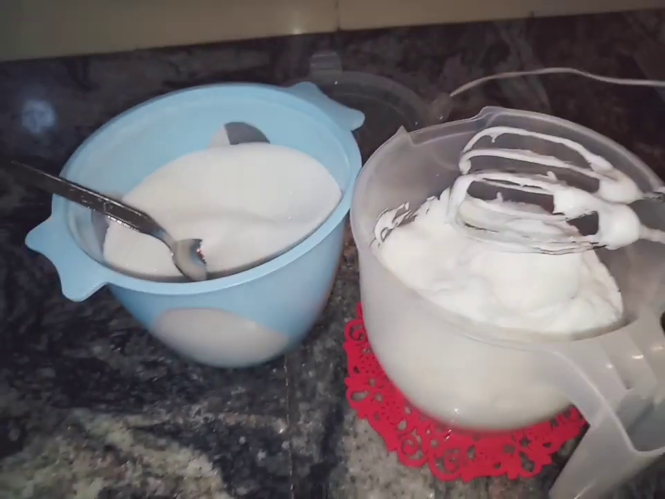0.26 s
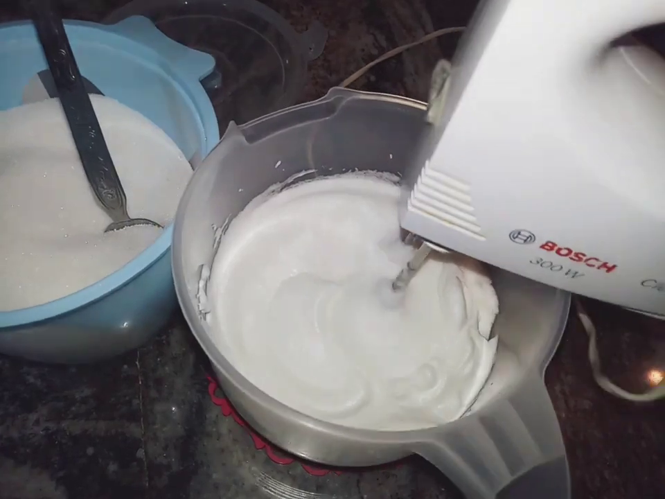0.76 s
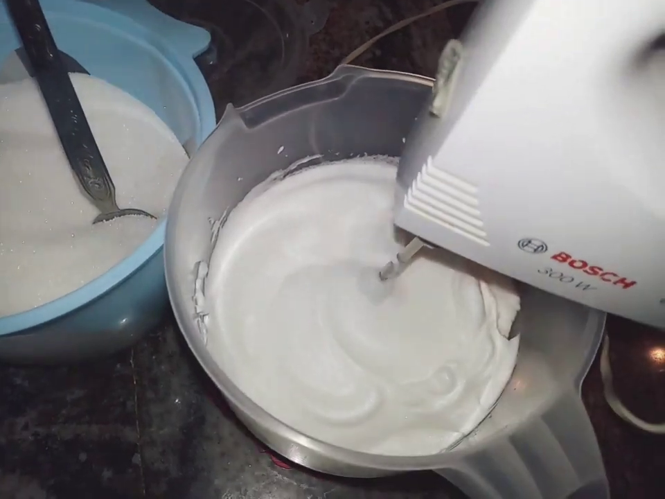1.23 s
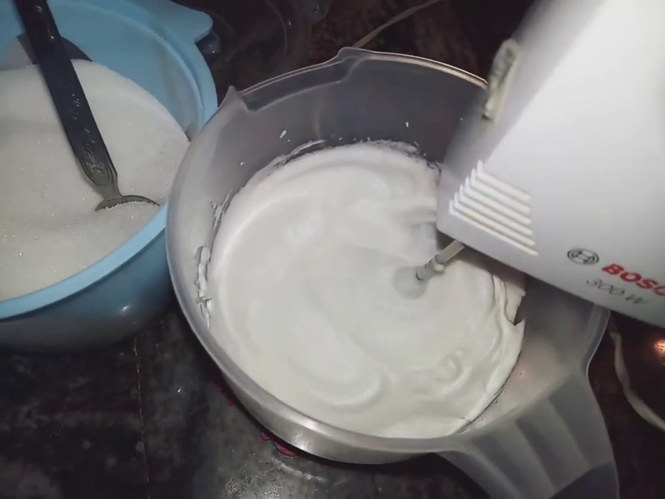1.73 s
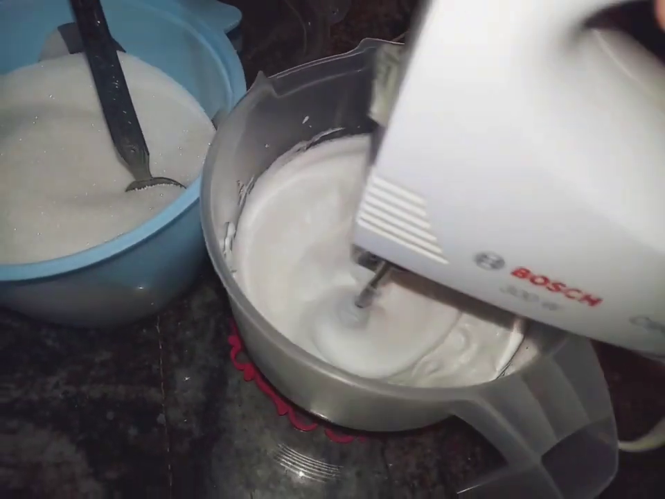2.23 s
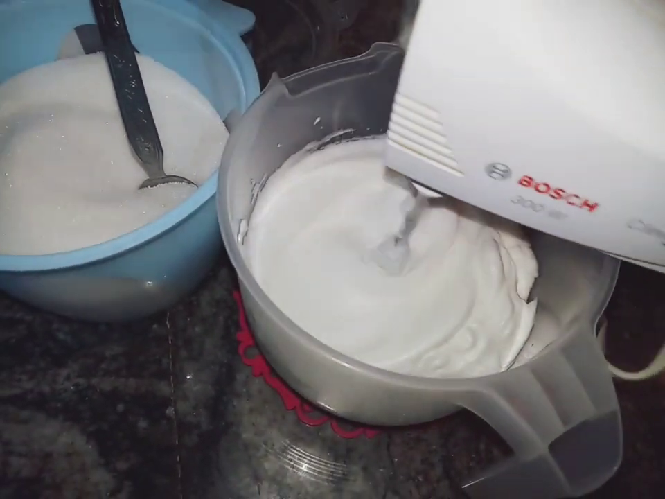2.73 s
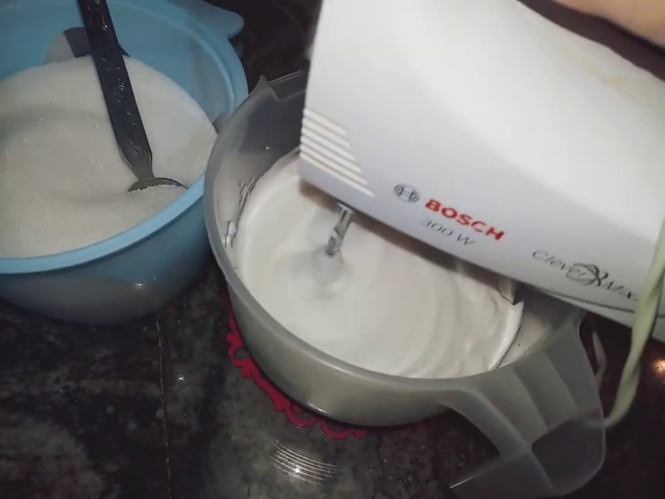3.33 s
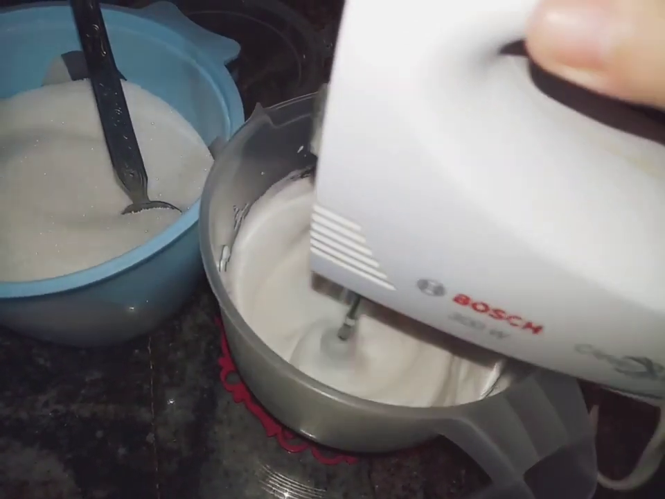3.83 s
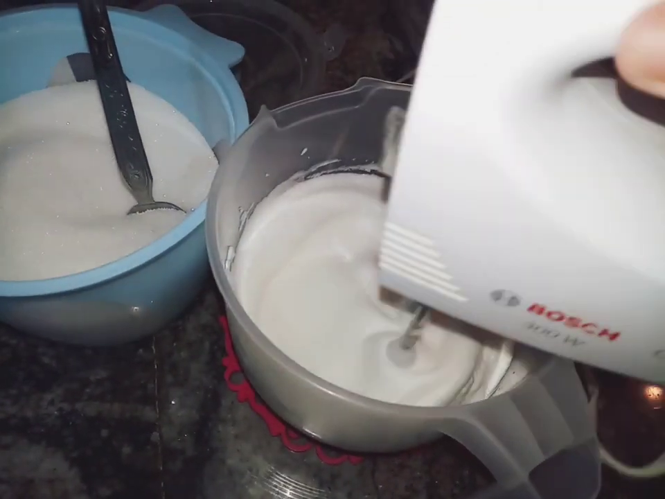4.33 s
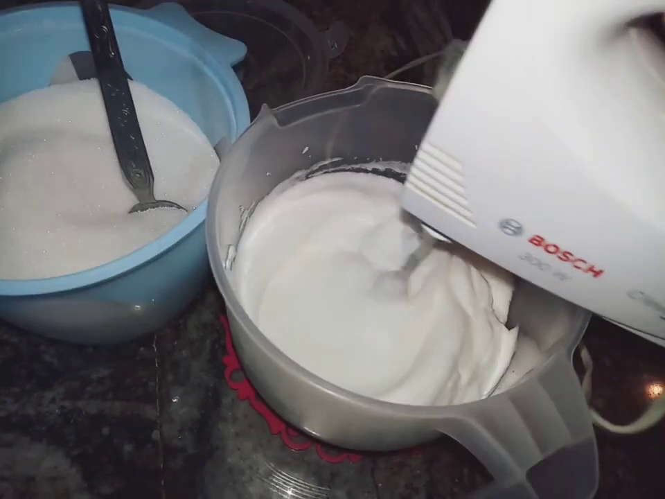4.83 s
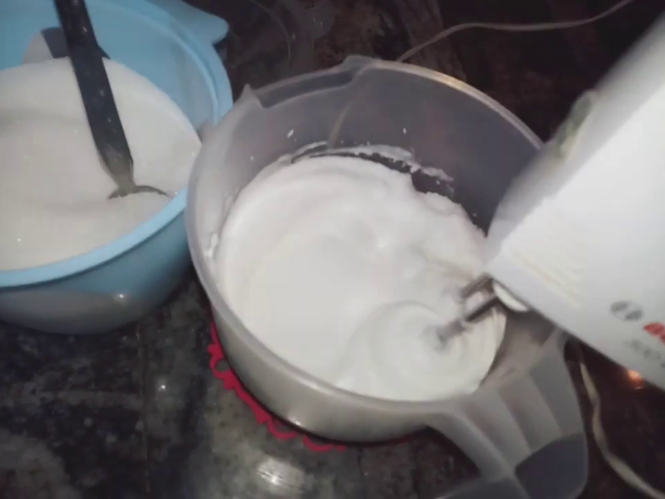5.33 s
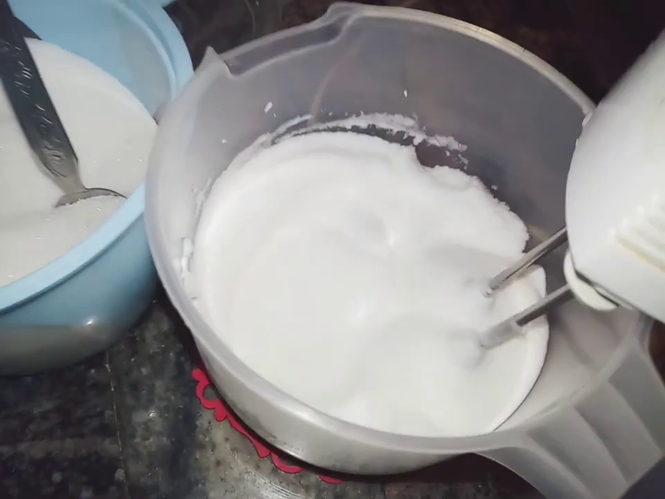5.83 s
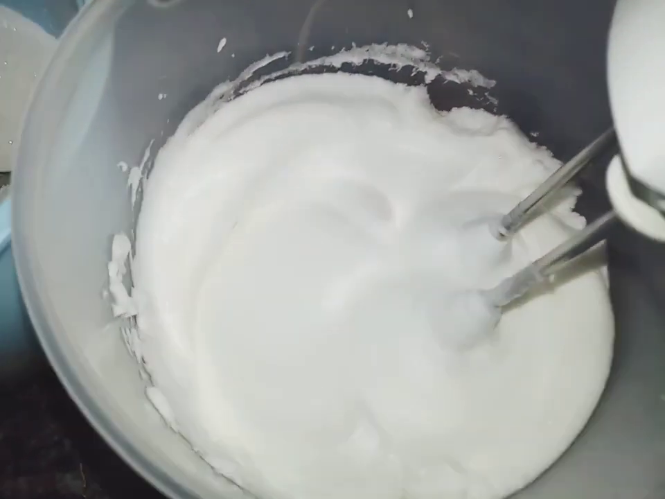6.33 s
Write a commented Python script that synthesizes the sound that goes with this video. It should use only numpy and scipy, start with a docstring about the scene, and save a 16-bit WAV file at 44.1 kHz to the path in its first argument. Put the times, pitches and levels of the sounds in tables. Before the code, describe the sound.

After a moment of faint hum and a brief silence, an electric hand mixer comes in with a soft bump, already at full speed. Its motor whines and throbs, the gears rasp, and cream churns in a plastic jug. The wire beaters rattle and knock against the jug wall in irregular bursts. Toward the end, a rush of air from the vents grows. It is heard close up on a kitchen counter.

```python
"""An electric hand mixer whips cream in a plastic jug on a kitchen counter, heard close up.
A faint low hum and thin whistles over dull hiss last 0.3 s, then silence. At 0.45 s the mixer comes in
with a soft bump, already at speed: the motor whines and throbs with the mains, gears rasp, cream churns,
the jug drones. The wire beaters rattle in bursts whenever they are steered against the jug wall.
Toward the end the vents turn to face the listener and their rush of air grows."""
import sys
import numpy as np
from scipy import signal
from scipy.fft import irfft, next_fast_len
from scipy.io import wavfile
from scipy.ndimage import uniform_filter1d, minimum_filter1d

SR = 44100
rng = np.random.default_rng(int(sys.argv[2]) if len(sys.argv) > 2 else 0)


def dump(signal):
    """Clip the signal to [-1, 1] and save it as 16-bit WAV at the path in sys.argv[1]."""
    limited = np.clip(np.atleast_2d(signal).T, -1, 1)
    pcm = np.round(limited * 32767).astype(np.int16)
    wavfile.write(sys.argv[1], SR, pcm)


N = 290178
T = np.arange(N) / SR
QUIET_END_S, MIXER_START_S = .301, .449
MAINS_HZ, ROTOR_SLOTS, GEAR_RATIO, WIRES = 50, 8, 21, 4


def amp(db):
    """Decibels to gain."""
    return 10 ** (np.asarray(db) / 20)


def unit(x):
    """Scales to an rms of 1."""
    return x / np.sqrt(np.mean(x ** 2) + 1e-20)


def curves(rows):
    """One automation curve for each table column after the time."""
    times, *columns = np.transpose(rows)
    return [np.interp(T, times, column) for column in columns]


def value_at(points, hz):
    """Reads a table along a log frequency axis."""
    freqs, values = np.transpose(points)
    return np.interp(np.log(hz + 1), np.log(freqs), values)


def colour(x, eq, size=2048):
    """Minimum-phase filter that follows an EQ curve."""
    log_gain = np.log(amp(value_at(eq, abs(np.fft.fftfreq(size, 1 / SR)))))
    taps = np.fft.ifft(np.exp(np.conj(signal.hilbert(log_gain)))).real
    return signal.oaconvolve(x, taps.reshape((1,) * (x.ndim - 1) + (-1,)), axes=-1)[..., :x.shape[-1]]


def band(x, low_hz, high_hz):
    """Steep band-pass."""
    return signal.sosfilt(signal.butter(3, [low_hz, high_hz], "band", fs=SR, output="sos"), x)


def ring(x, modes):
    """Sum of damped resonances; the dB of each sets its energy."""
    out = 0
    for hz, width, db in modes:
        radius = np.exp(-np.pi * abs(width) / SR)
        feedback = [1, -2 * radius * np.cos(2 * np.pi * hz / SR), radius ** 2]
        out = out + amp(db) * np.sqrt(1 - radius) * signal.lfilter([1, 0, -1], feedback, x)
    return out


def wander(hz, size=32768):
    """Smooth random modulation of rms 1, rolling off around hz."""
    length = next_fast_len(N, True)
    rolloff = np.exp(-.5 * (np.arange(size) * SR / length / hz) ** 2)
    real, imag = rng.standard_normal((2, size)) * rolloff
    return unit(irfft(real + 1j * imag, length)[:N])


# EQ of the dull opening hiss: (frequency [Hz], gain [dB])
OPENING_HISS_EQ = [(25, -14), (70, -16), (102, 6.5), (140, -15), (250, -11), (580, -15.5), (800, -31),
                   (1900, -33), (3000, -19), (5500, -19), (7800, -29), (9000, -59)]
# Thin whistles over that hiss: (frequency [Hz], width [Hz], relative level [dB])
WHISTLE_MODES = [(106, 13, -3.5), (1500, 78, -18), (2550, 5.4, -15), (3180, 49, -10), (4670, 55, -7),
                 (5350, 42, -11)]
# Steady tones of the opening: (frequency [Hz], relative level [dB])
HUM_TONES = [(247.6, -67.5), (592.2, -71.5), (1529, -83), (2369, -72), (2466, -75)]
def faint_opening_hum(floor_db=-57, whistle_db=-58, hum_db=-1):
    """A faint low hum and thin whistles over dull hiss, before the mixer comes in."""
    hiss, drive = rng.standard_normal((2, N))
    floor = amp(floor_db) * unit(colour(hiss, OPENING_HISS_EQ))
    whistles = amp(whistle_db) * unit(ring(drive, WHISTLE_MODES))
    hum = sum(amp(db) * np.sqrt(2) * np.cos(2 * np.pi * (hz * T + rng.random())) for hz, db in HUM_TONES)
    return floor + whistles + amp(hum_db) * hum


# Reverb time around the mixer: (frequency [Hz], time to fall 60 dB [s])
REVERB_TIMES = [(150, 0.12), (1000, 0.37), (4000, 0.11), (12000, 0.017)]
def reverb(x, predelay_s=.005):
    """A short diffuse room tail, the treble dying first."""
    hz, t, spectrum = signal.stft(rng.standard_normal(16384), SR, nperseg=256)
    decay = amp(-60 * t / value_at(REVERB_TIMES, hz)[:, None])
    tail = signal.istft(spectrum * decay, SR)[1]
    tail *= np.arange(len(tail)) > predelay_s * SR
    return signal.fftconvolve(x, tail / np.linalg.norm(tail))[:N]


def bump(hz=36, peak_db=-29, decay_s=.014):
    """A soft low bump as the mixer sound sets in."""
    t = np.maximum(T - MIXER_START_S, 0)
    return -amp(peak_db) * np.cos(2 * np.pi * hz * t) * np.exp(-t / decay_s) * (T > MIXER_START_S)


# Motor speed, sagging under load: (time [s], shaft rate [Hz])
MOTOR_SPEED = [(0.45, 279.5), (1.2, 281.7), (1.5, 281.2), (1.95, 285.4), (2.3, 289), (2.48, 289),
               (2.7, 284.7), (3.15, 286.4), (3.35, 289), (3.8, 285.6), (4, 289), (4.4, 282.6),
               (4.75, 290.9), (5.1, 289.5), (5.35, 284.6), (5.6, 283.9), (6.1, 286.9), (6.58, 285.3)]
def shaft_angle(ripple_rad=.06, jitter_hz=.15):
    """The motor shaft turns: each mains pulse nudges it ahead, and the cream drags unevenly."""
    hz = curves(MOTOR_SPEED)[0] + jitter_hz * wander(12.15)
    return 2 * np.pi * np.cumsum(hz) / SR + ripple_rad * np.sin(2 * np.pi * MAINS_HZ * T)


# Drag on the beaters: (time [s], load relative to light work [dB])
CREAM_DRAG = [(0.5, 2.5), (0.8, 4), (1.55, 5.5), (1.9, -1.5), (2.45, 1.5), (3.5, 0.5), (4.4, 2), (4.75, 1),
              (5.3, 4), (5.75, -1), (6.3, -2), (6.58, 4.5)]
def drag_gain(db_per_db):
    """Gain that rides the drag of the cream: heavier work is louder."""
    return amp(db_per_db * curves(CREAM_DRAG)[0])


def strokes(angle, depth=.06):
    """A light tremolo, one pulse for each passing wire."""
    return 1 + depth * np.cos(WIRES * angle / GEAR_RATIO)


# Swells of low boom: (time [s], relative level [dB])
BOOM_LEVEL = [(0.52, -42.5), (0.82, -44), (2.29, -52), (2.43, -37), (2.85, -59), (2.88, -45), (3.14, -63),
              (3.2, -39), (3.29, -68), (3.34, -52), (3.66, -59), (3.71, -44.5), (4.18, -60), (4.42, -45.5),
              (5.06, -56), (5.09, -44), (5.31, -60), (5.63, -43), (5.97, -50), (6.58, -44.5)]
def jug_boom(angle, boom_db=-3, hum_db=-7):
    """The jug booms as it is pressed on the counter; the two beaters' wires hum, passing in turn."""
    boom = unit(band(ring(rng.standard_normal(N), [(102, 14, 0)]), 84, 125))
    hum = unit(np.cos(2 * WIRES * angle / GEAR_RATIO + .38 * wander(4.5)))
    return amp(curves(BOOM_LEVEL)[0]) * (amp(boom_db) * boom + amp(hum_db) * hum)


# Slow shaking of the jug: (time [s], level [dB])
SHAKE_LEVEL = [(0.52, -50), (1.36, -61), (1.75, -53), (2.31, -75), (2.38, -57), (2.53, -67), (4.99, -66),
               (5.36, -49.5), (6.06, -72), (6.58, -59)]
# Partials of the shake and of the growl above it: (multiple of the beater rate, relative level [dB])
SHAKE_PARTIALS = [(4, -10), (5, 13), (6, -7)]
GROWL_PARTIALS = [(10, -4), (12, -21.5), (14, 2), (22, 5), (24, -13), (34, -6)]
def jug_drone(angle, waver=.38, growl_db=-52):
    """The beaters shake the jug at multiples of their own slow rate, growling under load."""
    def tones(partials):
        out = 0
        for multiple, db in partials:
            level = amp(db) * (1 + waver * wander(7.3))
            out += level * np.cos(multiple * angle / GEAR_RATIO + waver * wander(5))
        return unit(out)

    shake = amp(curves(SHAKE_LEVEL)[0]) * tones(SHAKE_PARTIALS)
    growl = amp(growl_db) * drag_gain(2.25) * tones(GROWL_PARTIALS)
    return shake + growl


# Air from the vents, strongest at the end: (time [s], relative level [dB])
VENT_LEVEL = [(0.5, -53), (1.3, -50), (2.1, -46), (2.42, -49), (2.65, -47), (4.4, -44), (5.2, -49.5),
              (5.75, -41), (6.58, -38)]
# EQ of the fan hiss: (frequency [Hz], gain [dB])
FAN_EQ = [(4000, -19), (7600, 8), (8900, 7), (9800, 2), (12300, 1), (13700, -1), (14800, -1), (16000, -0.5)]
# Resonances of the cooling ducts: (frequency [Hz], width [Hz], relative level [dB])
DUCT_MODES = [(248, 110, -5.5), (660, 290, -6), (876, 110, -8.5), (2190, 220, -7), (2440, 130, -2),
              (4345, 140, 1.5), (5400, 300, 0)]
def vent_air(angle, hiss_db=4, hoot_db=-29, flutter=.1):
    """Cooling air hisses and the ducts hoot, much more so when the vents face the listener."""
    fan, duct = rng.standard_normal((2, N))
    air_db = curves(VENT_LEVEL)[0]
    hiss = unit(colour(fan * (1 + flutter * np.cos(2 * angle)), FAN_EQ))
    hoot = unit(band(ring(duct, DUCT_MODES), 130, 5500))
    facing_db = 2.15 * (air_db - air_db.max())
    return amp(hiss_db + air_db) * hiss + amp(hoot_db + facing_db) * hoot


# EQ of the churning cream: (frequency [Hz], gain [dB])
CHURN_EQ = [(30, -39), (80, -22), (150, -15.5), (200, -7), (290, 1.5), (380, -2), (560, 0), (720, -2),
            (1000, -5.5), (1550, -5), (2200, -14.5), (5000, -66)]
# Air resonance of the jug: (frequency [Hz], width [Hz], relative level [dB])
CAVITY_MODES = [(1060, 570, 0)]
def cream_churn(angle, churn_db=-38.5, hollow_db=-42, slap_db=1.4):
    """The wires slap through the cream and stir the hollow note of the jug."""
    foam, cavity = rng.standard_normal((2, N))
    slaps = strokes(angle) * amp(slap_db * wander(55))
    churn = unit(colour(foam * slaps, CHURN_EQ))
    hollow = unit(band(ring(cavity * slaps, CAVITY_MODES), 892, 1278))
    return amp(churn_db) * drag_gain(1.02) * churn + amp(hollow_db) * drag_gain(.66) * hollow


# EQ of the gear rasp: (frequency [Hz], gain [dB])
GEAR_EQ = [(900, -33.5), (1650, -9), (2050, 1), (2400, 0), (3400, 2.5), (4500, 0.5), (5000, -2),
           (5700, -0.5), (6400, -6), (7600, -6.5), (8800, -19.5), (10000, -16.5), (15000, -28)]
# Resonances of the mixer housing: (frequency [Hz], width [Hz], relative level [dB])
HOUSING_MODES = [(2270, 590, 3), (2830, 120, -28), (4320, 140, -1), (4660, 140, -2), (5470, 140, 9)]
def gear_rasp(angle, rasp_db=-31.5, housing_db=-8, grain_db=2.5, mesh_depth=.1):
    """Gritty gears mesh and sound through the housing, louder under load."""
    grit = rng.standard_normal(N) * amp(grain_db * wander(970))
    grit *= strokes(angle) * (1 + mesh_depth * np.cos(angle))
    teeth = unit(colour(grit, GEAR_EQ))
    scrambled = grit * rng.choice([-1, 1], N)  # same grain, but cannot cancel the teeth
    housing = unit(band(ring(scrambled, HOUSING_MODES), 2060, 4450))
    return amp(rasp_db) * drag_gain(.7) * (teeth + amp(housing_db) * housing)


# Whine as the mixer is turned about: (time [s], relative level of each of partials 1 to 5 [dB])
WHINE_LEVELS = [(1.1, -39, -53, -53, -61, -50), (1.8, -46, -39, -40, -51, -50),
                (2.2, -42, -35.5, -41, -51, -53), (2.7, -42, -43, -43, -48, -45.5),
                (4.75, -41, -42, -40.5, -48, -45.5), (5.2, -32, -31, -42, -56, -53),
                (5.6, -41, -45, -32.5, -47, -54), (6.55, -37.5, -40, -37.5, -52, -44)]
# Faint top of the whine: (relative level of each of partials 6 and 7 [dB])
WHINE_TOP_LEVELS = [-57, -53]
def motor_whine(angle, throb=.1, fuzz_hz=80, trim_db=-2):
    """Rotor slots pass the poles: seven fuzzy partials that throb with the mains."""
    out = np.zeros(N)
    for k, db in enumerate(curves(WHINE_LEVELS) + WHINE_TOP_LEVELS, 1):
        phase, fuzz = k * ROTOR_SLOTS * angle, 1 / np.sqrt(k)
        partial = (1 + fuzz * wander(fuzz_hz)) * np.cos(phase) + fuzz * wander(fuzz_hz) * np.sin(phase)
        out += amp(db) * unit(partial)
    return amp(trim_db) * out * (1 + throb * np.cos(2 * np.pi * MAINS_HZ * T))


# Beaters held against the jug; clatter, ring and thud are the relative levels of a knock's layers:
# (first knock [s], last knock [s], every nth wire, clatter [dB], ring [dB], thud [dB], slant [0-1])
RATTLE_BURSTS = [(0.6732, 1.125, 2, -20.5, -28, -31, 0.91), (1.309, 1.431, 2, -30, -28, -36, 0),
                 (1.4598, 1.646, 2, -23, -25.5, -33, 0), (2.1598, 2.31, 4, -31, -26.5, -37.5, 0.1),
                 (2.342, 2.3597, 1, -21.5, -19, -27.5, 0.3), (2.376, 2.4814, 1, -17.5, -18.5, -24, 0.32),
                 (2.518, 2.5565, 1, -29.5, -28, -32.5, 0), (2.8707, 2.9355, 1, -23.5, -18, -33, 1),
                 (2.9500, 3.0447, 1, -27, -16.5, -31, 0.58), (3.1853, 3.2035, 1, -29, -25.5, -35, 0),
                 (3.6625, 3.701, 1, -34, -23, -31.5, 0), (4.2623, 4.2816, 1, -35, -22.5, -33, 0),
                 (4.337, 4.3585, 1, -25, -18, -28, 0.99), (4.4163, 4.44, 1, -32, -15.5, -31, 1),
                 (4.546, 4.5965, 1, -17.5, -19, -25.5, 0.1), (4.616, 4.67, 1, -25.5, -31.5, -43, 0.04),
                 (4.8574, 4.873, 1, -23, -45.5, -34.5, 0), (4.9271, 4.9602, 1, -25.5, -42, -37.5, 0),
                 (5.0008, 5.02, 1, -28.5, -25, -41, 0), (5.0388, 5.146, 1, -20.5, -20, -37, 0.6),
                 (5.1825, 5.439, 1, -20, -22.5, -38, 1), (5.4765, 5.7172, 1, -23.5, -34, -40.5, 0.8)]
# A fully slanted beater meets the wall unevenly: (level offset of each of wires 1 to 4 [dB])
SLANT_OFFSETS = [-1, -1, -4, -13]
# Stray knocks of one wire: (time [s], clatter [dB], ring [dB], thud [dB])
STRAY_KNOCKS = [(0.4736, -25, -31.5, -37), (0.5478, -22.5, -26.5, -30), (0.5994, -24.5, -27.5, -29),
                (1.1481, -23, -51, -54), (1.1848, -21, -38, -31), (1.26, -24, -35, -35),
                (2.5005, -19.5, -26, -38), (2.8555, -25, -28.5, -44), (3.7634, -30.5, -24.5, -34),
                (3.9953, -31.5, -27.5, -46), (4.077, -25.5, -31.5, -36), (4.322, -36.5, -23, -43),
                (5.871, -23.5, -27, -36), (6.0711, -29.5, -43, -38), (6.45, -27, -44, -44)]
# Light grazes near the wall: (start [s], end [s], clatter [dB], ring [dB], thud [dB])
GRAZES = [(0.55, 1.677, -29, -35, -36), (5.901, 6.57, -36, -44, -58)]
def knock_cues(angle, grazes=16, scatter_db=1):
    """One row a knock (time, three levels); bursts and grazes keep pace with the passing wires."""
    passes = WIRES * angle / (2 * np.pi * GEAR_RATIO)
    cues = list(STRAY_KNOCKS)
    for first_s, last_s, nth, *levels, slant in RATTLE_BURSTS:
        first, last = np.interp([first_s, last_s], T, passes)
        for k, place in enumerate(np.linspace(first, last, round((last - first) / nth) + 1)):
            wire_db = slant * SLANT_OFFSETS[k * nth % WIRES]
            cues.append((np.interp(place, passes, T), *(np.array(levels) + wire_db)))
    for first_s, last_s, *levels in GRAZES:
        first, last = np.interp([first_s, last_s], T, passes)
        places = np.round(first + (last - first) * (np.arange(grazes) + rng.random(grazes)) / grazes)
        cues += [(time, *levels) for time in np.interp(places, passes, T)]
    cues = np.array(cues)
    cues[:, 1:] += scatter_db * rng.standard_normal((len(cues), 3))
    return cues


KNOCK_SAMPLES, PREROLL_SAMPLES = 4096, 512
def chatter(start_s, length_s, swell_db, spread_db, count):
    """One row a knock: uneven contacts of wire on plastic, pushing and pulling."""
    place, sign, strength = np.moveaxis(rng.random((len(length_s), 3, count)), 1, 0)
    progress = (np.arange(count) + place) / count
    force = np.sign(sign - .5) * amp(swell_db * progress + spread_db * strength)
    at = PREROLL_SAMPLES + (start_s[:, None] + progress * length_s[:, None]) * SR
    contacts = np.zeros((len(length_s), KNOCK_SAMPLES))
    np.put_along_axis(contacts, np.clip(at, 0, KNOCK_SAMPLES - 1).astype(int), force, 1)
    return contacts


# EQ of the wire clatter: (frequency [Hz], gain [dB])
CLATTER_EQ = [(50, -29), (150, -15.5), (300, -8), (750, -8), (1200, -1.5), (1600, -9.5), (2200, -0.5),
              (3000, 0), (3900, 2.5), (5200, 2), (6400, -5.5), (8500, -10.5), (9600, -23.5), (15000, -29)]
# Ring of the plastic wall and thud of the jug: (frequency [Hz], width [Hz], relative level [dB])
WALL_MODES = [(2990, 170, 0), (2810, 150, -1), (2400, 260, -10)]
THUD_MODES = [(505.6, 41, 7), (442, 28, 3), (564, 38, -17)]
def beater_rattle(angle, tap_s=.0008, scrape_s=.0072, snap_s=.0014, shiver_s=.0038):
    """A wire taps the wall and rings it; the harder it catches, the longer it scrapes, then snaps free."""
    times, clatter_db, ring_db, thud_db = knock_cues(angle).T
    catch = amp(clatter_db) / (amp(clatter_db) + amp(ring_db))
    length_s = tap_s + scrape_s * np.tanh((2 * catch) ** 2)
    start_s, press_s = -.8 * length_s, .55 * length_s
    taps = chatter(start_s, press_s, swell_db=-8, spread_db=12, count=4)
    scrapes = chatter(start_s, length_s, swell_db=8, spread_db=12, count=20)
    snaps = chatter(np.zeros_like(times), np.full_like(times, snap_s), swell_db=0, spread_db=6, count=6)
    push = chatter(start_s, press_s, swell_db=0, spread_db=0, count=1)
    blows = scrapes + amp(15) * snaps
    # every contact leaves a brief shiver in the wire cage
    shiver = amp(-22) * rng.standard_normal(taps.shape) * np.exp(-T[:KNOCK_SAMPLES] / shiver_s)
    blows += signal.fftconvolve(blows, shiver, axes=1)[:, :KNOCK_SAMPLES]
    clatter = colour(blows, CLATTER_EQ)
    wall = band(ring(taps, WALL_MODES), 1430, 5600)
    thud = band(ring(push, THUD_MODES), 245, 1230)
    knocks = 0
    for layer, db in (clatter, clatter_db + 2), (wall, ring_db - 1), (thud, thud_db):
        rms = np.sqrt((layer ** 2).sum(1, keepdims=True) / 600)  # as if packed into 600 samples
        knocks += amp(db)[:, None] * layer / rms
    out = np.zeros(N + 2 * KNOCK_SAMPLES)
    for start, knock in zip(np.round(times * SR).astype(int) - PREROLL_SAMPLES, knocks):
        out[start:start + KNOCK_SAMPLES] += knock
    return out[:N]


def scene(reverb_db=-15, rise_s=.016):
    """A faint hum, silence, then the mixer at work; the same in both ears."""
    angle = shaft_angle()
    rattle = beater_rattle(angle)
    machine = motor_whine(angle) + gear_rasp(angle) + vent_air(angle)
    jug = cream_churn(angle) + jug_drone(angle) + jug_boom(angle)
    mixer = jug + machine + rattle + amp(reverb_db) * reverb(rattle)
    fade_in = 1 - np.exp(-np.maximum(T - MIXER_START_S, 0) / rise_s)
    mono = faint_opening_hum() * (T < QUIET_END_S) + bump() + mixer * fade_in
    return np.array([mono, mono])


def record(dry, ceiling=.59, cutoff_hz=15800):
    """A fast limiter holds the sharpest peaks; a steep low-pass trims the top."""
    gain = np.minimum(1, ceiling / (abs(dry).max(0) + 1e-9))
    gain = uniform_filter1d(minimum_filter1d(gain, size=65), size=65)
    lowpass = signal.firwin(511, cutoff_hz, window=("kaiser", 9), fs=SR)
    return signal.oaconvolve(dry * gain, lowpass[None], "same")


dry = scene()
out = record(dry)
dump(out)
```